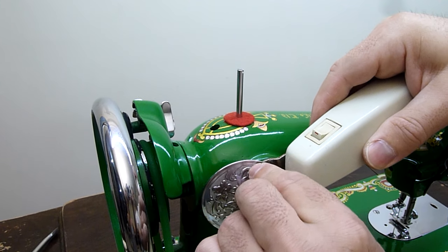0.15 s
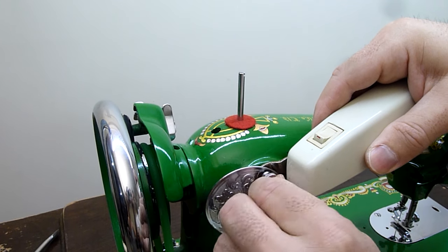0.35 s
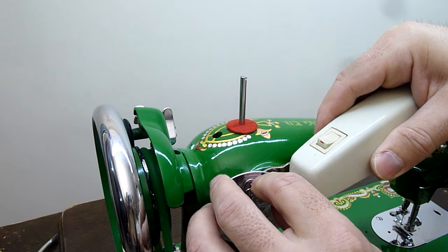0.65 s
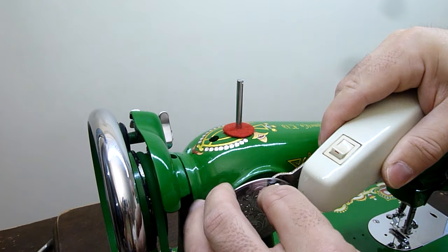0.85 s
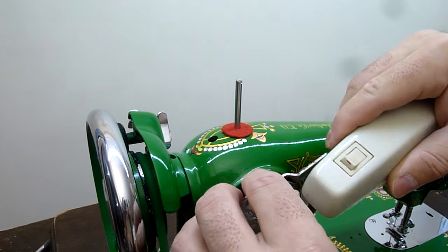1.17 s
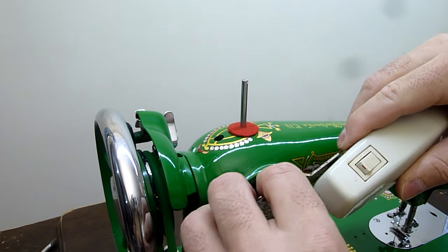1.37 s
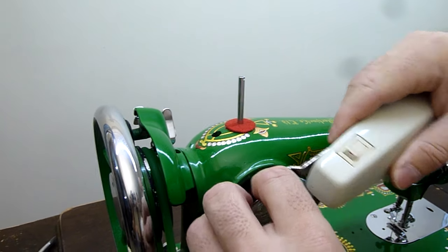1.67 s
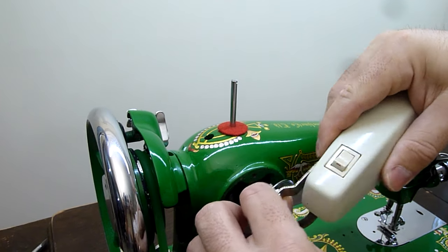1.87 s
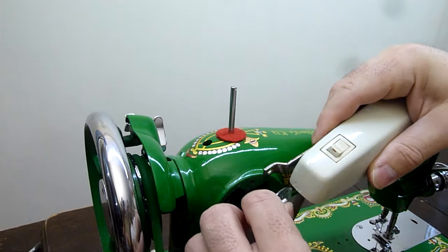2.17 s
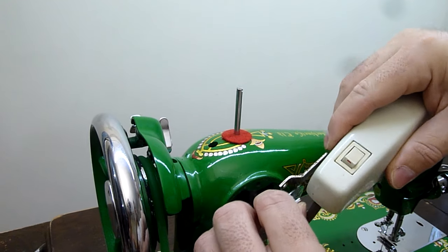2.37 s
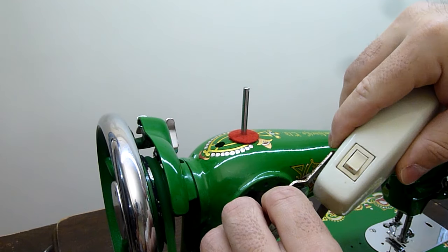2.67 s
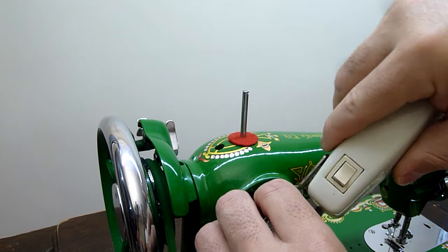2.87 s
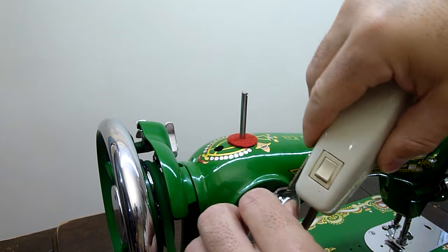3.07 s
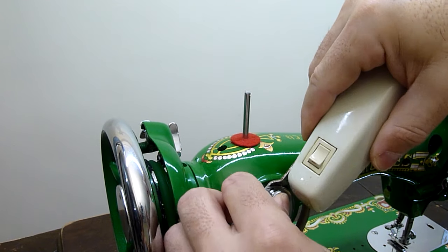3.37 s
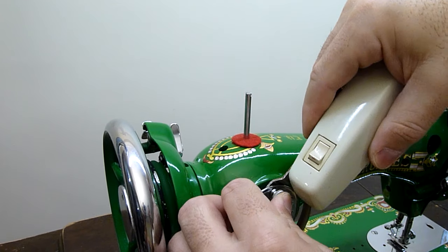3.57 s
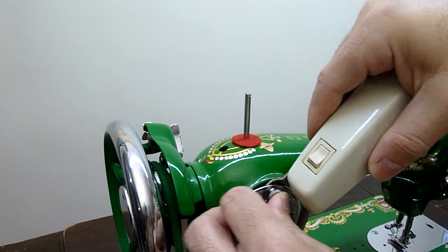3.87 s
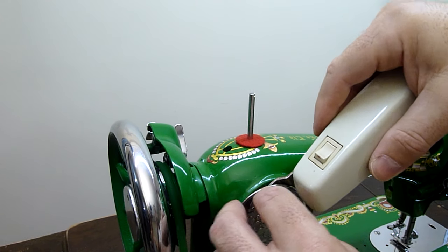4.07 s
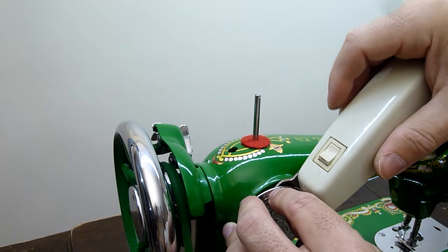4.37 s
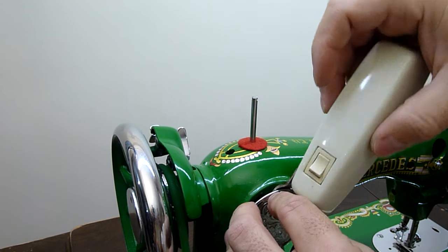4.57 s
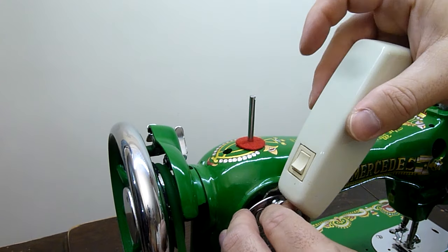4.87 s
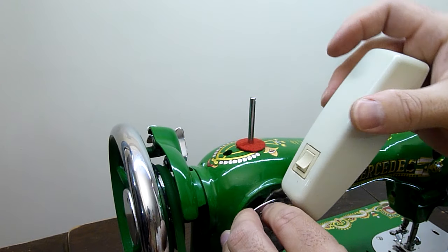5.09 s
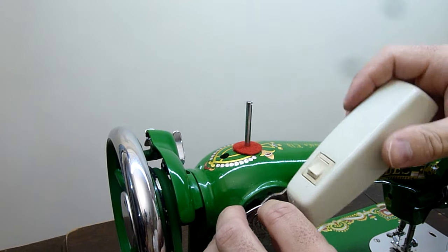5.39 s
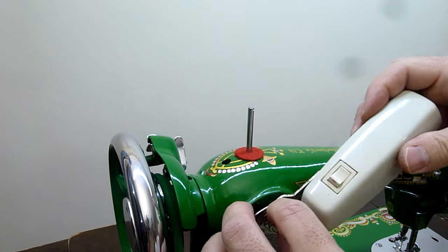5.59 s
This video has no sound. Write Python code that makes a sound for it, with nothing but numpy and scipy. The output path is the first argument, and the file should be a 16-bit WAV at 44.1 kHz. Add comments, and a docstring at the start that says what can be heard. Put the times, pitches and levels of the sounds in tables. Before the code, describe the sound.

Small metal parts clink, tap and scrape in irregular clusters against a hollow cast metal machine body, close up in a small hard room.

```python
"""Hands turn a small cover plate, lamp bracket and thumb screw on a sewing machine's hollow cast arm.
From the start, noise-burst cracks set decaying modes of arm and parts ringing, over random rubbing slips;
the touches are strongest from about 1.4 to 1.9 s. A thin wavering tone swells near 4.5 s, and a dull low
thud falls at 5.4 s. Throughout, a small hard room of feedback delays answers the close sounds, above
coloured-noise hush, steady mains sines and a low sine hum that comes and goes until about 4.5 s."""
import sys
import numpy as np
from scipy import signal
from scipy.fft import rfft, irfft, next_fast_len
from scipy.io import wavfile

SR = 44100
rng = np.random.default_rng(int(sys.argv[2]) if len(sys.argv) > 2 else 0)


def output_pcm(signal):
    """Save a mono or channel-first signal as 16-bit PCM at the path in sys.argv[1].

    Samples are clipped to [-1, 1] before scaling.
    """
    pcm = np.clip(np.atleast_2d(signal).T, -1, 1) * 32767
    wavfile.write(sys.argv[1], SR, np.round(pcm).astype(np.int16))


N = 252693


def from_db(db):
    """Decibels to gain."""
    return 10 ** (np.asarray(db) / 20)


def rms_one(x):
    """Scale to unit rms."""
    return x / np.sqrt(np.mean(x ** 2) + 1e-20)


def in_time(rows):
    """Draw each column of a table as a straight-line curve over every sample."""
    s, *columns = np.transpose(rows)
    return [np.interp(np.arange(N) / SR, s, column) for column in columns]


def at_hz(points, hz):
    """Read a table over frequency on a log axis."""
    table_hz, values = np.array(points).T
    return np.interp(np.log(hz), np.log(table_hz), values)


def band(x, low, high):
    """Gentle band-pass."""
    return signal.sosfilt(signal.butter(2, [low, high], "band", fs=SR, output="sos"), x + 1e-18)


def ring(clicks, hz, t60):
    """A two-pole resonator: a unit click starts a decaying sine of about unit height."""
    radius = from_db(-60 / (max(t60, .005) * SR))
    angle = 2 * np.pi * hz / SR
    return signal.lfilter([0, np.sin(angle)], [1, -2 * radius * np.cos(angle), radius ** 2], clicks + 1e-18)


def drift(rate):
    """Random wander: straight lines between normal draws, rate draws per second."""
    knots = rng.standard_normal(int(N / SR * rate) + 2)
    return np.interp(np.arange(N) / SR * rate, np.arange(len(knots)), knots)


def grit(per_s, spread_db):
    """Random tiny slips of uneven size and either sign; rms 1."""
    sizes = from_db(spread_db * np.minimum(rng.exponential(1, N), 5)) * rng.choice([-1, 1], N)
    return rms_one(sizes * (rng.random(N) < per_s / SR))


def coloured(white, spectrum, likeness=None):
    """Weight noise in half-octave bands, neighbours on unrelated draws; likeness makes it stereo; rms 1."""
    out = 0
    edges = 23 * 2 ** np.arange(0, 9.6, .5)
    for k, (low, high) in enumerate(zip(edges, edges[1:])):
        hz = np.sqrt(low * high)
        x = band(white[k % 2], low, high)
        if likeness:
            alike = np.clip(at_hz(likeness, hz), -1, 1)
            x = np.sqrt(1 + alike) * x[0] + np.sqrt(1 - alike) * x[1] * [[1], [-1]]
        out = out + from_db(at_hz(spectrum, hz)) * x
    return rms_one(out)


# touches of the hands, before band weighting: [t/s, parts level/dB, arm level/dB, treble level/dB,
#   favoured arm f/Hz, favoured part f/Hz, base crack t60/s,
#   fall around arm pitch/dB per octave, fall around part pitch/dB per octave, parts' ring level/dB]
TOUCHES = [(0.0185, -24.5, -34, -47, 564, 2940, 0.013, 14, 10, -10),
           (0.0339, -15, -25.5, -34, 564, 5700, 0.036, 2.5, 10.5, -0.5),
           (0.1746, -31, -52, -60, 560, 3030, 0.029, 8.0, 11, -7),
           (0.193, -45, -43.5, -54, 552, 5870, 0.03, 8.0, 5, -8),
           (0.2693, -19.5, -44, -31, 1460, 5300, 0.052, 8.0, 8.5, 4.5),
           (0.2831, -26, -38, -43, 590, 5320, 0.036, 14, 1, -12),
           (0.3075, -12.5, -24, -20.5, 510, 5700, 0.022, 3, 3, -0.5),
           (0.4314, -30.5, -61, -37, 600, 5800, 0.04, 10, 7.0, -4),
           (0.4414, -33, -29.5, -26.5, 690, 5910, 0.028, 13, -2.5, -1.0),
           (0.46, -24, -31.5, -36, 1100, 6060, 0.028, -3.5, 1, 2.5),
           (0.4953, -56, -37, -58, 1360, 5960, 0.072, 7, 7.0, -4),
           (0.607, -28, -37, -52, 1400, 2930, 0.031, 3, 0, -2),
           (0.6154, -26.5, -41, -37, 546, 7200, 0.035, 13, 7.0, -6),
           (0.7163, -22.5, -29, -37.5, 633, 3060, 0.028, 3.5, 4, -1.0),
           (0.7352, -29.5, -39.5, -42, 1180, 4780, 0.031, 1, 3, -1.5),
           (0.7613, -38, -47, -57, 653, 4700, 0.027, 8.0, 7.0, -1.0),
           (0.7761, -31.5, -27.5, -48, 610, 4600, 0.013, 13, -2, 1.5),
           (0.814, -37, -42, -46, 596, 2530, 0.046, 7, 5, -6),
           (0.83, -18.5, -50, -31, 530, 3800, 0.017, 8.0, 2, -5.5),
           (0.848, -34, -34, -54, 590, 3540, 0.013, 8.0, 9, -5),
           (0.8839, -31.5, -32, -51, 548, 4670, 0.016, 4.5, -2, -1.0),
           (0.9643, -26, -43, -43, 585, 3480, 0.028, -4, 4.5, 3.5),
           (1.051, -22, -45, -35.5, 1270, 3830, 0.03, 1, 10.5, 6.5),
           (1.1002, -27, -49, -32, 1226, 3100, 0.02, 3, -9.5, -5),
           (1.4258, -11.5, -20.5, -30, 596, 4690, 0.028, 12.5, -2.5, 0),
           (1.5653, -15, -28, -25, 530, 6910, 0.063, 3.5, 1.5, 4),
           (1.5725, -11.5, -50, -22, 536, 4580, 0.071, 5, 9.5, -4.5),
           (1.6532, -15, -19.5, -30, 605, 4460, 0.051, 10.5, -1.5, 4),
           (1.6825, -21, -33, -40, 606, 3080, 0.05, 7, 4, 2),
           (1.735, -17, -29, -31, 605, 6800, 0.059, 5.5, 13, 1),
           (1.7516, -12.5, -30, -25, 592, 2340, 0.06, 13, 2, 1),
           (1.7798, -22.5, -24, -32, 670, 2250, 0.053, 7.5, -1, 1),
           (1.7945, -9.5, -34.5, -14, 505, 5500, 0.054, 11, 12, -5),
           (1.8204, -19.5, -46, -17.5, 1190, 3200, 0.014, 14, -10, 1.5),
           (1.9178, -28, -50, -31, 550, 3170, 0.013, 8.0, -9, 2.5),
           (2, -24, -43.5, -42, 587, 4530, 0.022, 1, 4.5, 5.5),
           (2.0911, -41, -40.5, -73, 1050, 3950, 0.038, 8.0, 12, -4),
           (2.367, -9, -39, -22, 631, 4620, 0.059, 5, 8.5, -1.5),
           (2.4861, -25, -38.5, -41, 632, 5900, 0.014, 5, 0.5, -2),
           (2.5087, -11, -38, -27.5, 604, 7040, 0.067, 3, 5, 2.5),
           (2.669, -29.5, -47.5, -60, 1310, 2370, 0.036, 8.0, 7.0, -1.0),
           (2.7254, -29.5, -36.5, -49, 1380, 4660, 0.015, 7, -8.5, -1.0),
           (2.7478, -19, -37.5, -33.5, 603, 4440, 0.035, 2, 5.5, 1.5),
           (2.8446, -23.5, -45.5, -41, 546, 2530, 0.027, 3, 2, 0.5),
           (3.0354, -33.5, -33.5, -64, 900, 2350, 0.02, 9, 9, -10),
           (3.1173, -24.5, -28.5, -45, 1115, 2960, 0.034, 15, 11, 1),
           (3.1413, -17.5, -39, -32.5, 607, 2860, 0.013, 11, 4.5, -1.0),
           (3.3073, -37, -42.5, -64, 570, 2640, 0.03, -6, 18, -1.0),
           (3.4094, -29.5, -40, -56, 607, 2640, 0.028, -4, 8, -1.0),
           (3.424, -27, -41.5, -56, 576, 2720, 0.027, 2, 9, 2),
           (3.502, -28, -62, -53, 684, 2660, 0.044, 8.0, 10.5, -1.0),
           (3.6307, -22.5, -36, -44, 510, 4680, 0.061, 2.5, 3, 3),
           (3.678, -43, -41, -56, 557, 4670, 0.067, 2.5, 0, 7),
           (3.81, -38, -44, -43, 540, 6900, 0.025, 19, 7.0, 2.5),
           (3.9384, -40.5, -43.5, -50, 960, 3040, 0.027, -6, 2, 2),
           (4.1909, -32, -34, -54, 544, 2350, 0.033, 8.0, 9, -17),
           (4.3981, -42, -54, -42, 1200, 3520, 0.036, 8.0, 7.0, -2),
           (4.563, -28.5, -32.5, -45, 526, 3530, 0.025, 6.5, 11, 2),
           (4.6021, -22.5, -66, -29.5, 576, 6200, 0.032, 8.0, 9, -3),
           (4.6272, -17.5, -57, -55, 598, 6000, 0.03, 12, 14, -16),
           (4.6594, -44, -41, -55, 630, 3650, 0.029, 8.0, 7.0, -1.0),
           (4.6972, -34.5, -45, -50, 546, 4580, 0.019, 8.0, -4, 5),
           (4.7206, -22.5, -38.5, -47, 1230, 3220, 0.051, 9, 25, -1.0),
           (4.7595, -19, -40, -37, 1170, 4200, 0.018, 4, 1.5, -2.5),
           (4.7788, -44, -39, -54, 1420, 5800, 0.027, 15, 5, -4),
           (4.8374, -24, -37, -52, 540, 2670, 0.048, 1.5, 8, 2),
           (4.9437, -34, -34, -46, 531, 2900, 0.038, 3, 0, 0.5),
           (5.0805, -38, -42.5, -50, 1354, 2120, 0.12, 0, 3, 8),
           (5.1027, -31.5, -39.5, -40, 620, 4460, 0.04, -2, -1.5, 2.5),
           (5.1134, -31.5, -36.5, -58, 530, 2830, 0.075, 3, 14, -1.0),
           (5.2091, -19, -47.5, -33.5, 1170, 7360, 0.067, 8.0, 10, -6),
           (5.3746, -26, -39, -42, 1130, 2880, 0.046, 10, 3, 6),
           (5.3928, -16.5, -26.5, -42, 935, 3800, 0.049, 8.5, 13, -7),
           (5.3961, -24, -29.5, -35, 874, 2840, 0.029, 1, 9, 5),
           (5.4234, -22.5, -39.5, -32, 937, 3780, 0.025, 6, 10, -1.0),
           (5.5184, -37, -36, -46, 991, 4700, 0.024, 5, -7, -6.5),
           (5.5707, -33.5, -47.5, -77, 578, 2660, 0.026, 5, 18, -1.0)]
# edges of the five touch bands, low to high: [f/Hz]
TOUCH_EDGES_HZ = [400, 750, 1700, 3700, 8000, 16500]
# how hard a touch drives each band: [level/dB]
BAND_DB = [-4.5, 5.5, -4, -3.5, 3.5]


def touch_colours():
    """Touch level per band: arm and parts tilt around their favoured pitch, the treble stands alone."""
    part_db, arm_db, treble_db, arm_hz, part_hz = np.array(TOUCHES)[:, 1:6].T
    arm_fall, part_fall = np.array(TOUCHES)[:, 7:9].T
    edges = np.array(TOUCH_EDGES_HZ)
    centre = np.sqrt(edges[1:] * edges[:-1])[:, None]
    arm = arm_db - arm_fall * abs(np.log2(centre[:2] / arm_hz))
    part = part_db - part_fall * abs(np.log2(centre[2:4] / part_hz))
    return np.vstack([arm, part, treble_db]).T + BAND_DB


RISE_S = .0016   # base build-up time of a touch
CRACK_DB = 4
TICK_DB, TICK_SHARE = -1, 0.043   # sharp head of a crack: level, share of the crack's t60
# crack length in each band: [multiple of the touch's base t60]
CRACK_LENGTH = [2.2, 1.33, 0.73, 0.65, 0.43]
# crack build-up in each band: [multiple of RISE_S]
CRACK_RISE = [0.95, 2.6, 0.39, 0.54, 0.27]
# left-right difference of a crack in each band: [level/dB]
CRACK_SIDE_DB = [-16, -17, -14.5, -5, -5.5]


def cracks():
    """A dying noise burst per touch, shaped by band; treble dies first, the top two bands spread widest."""
    t = np.arange(round(.12 * SR)) / SR
    noise = rng.standard_normal((len(TOUCHES), 2, len(t)))
    layers = np.zeros((5, 2, N + len(t)))
    for row, colour_db, burst in zip(TOUCHES, touch_colours(), noise):
        at = round(row[0] * SR)
        t60 = np.clip(row[6], .004, .3) * np.array(CRACK_LENGTH)[:, None]
        rise = np.minimum(t / (RISE_S * np.array(CRACK_RISE)[:, None]), 1)
        body = from_db(-60 * t / t60)
        tick = from_db(TICK_DB - 60 * t / (TICK_SHARE * t60))
        shape = rise * (body + tick) * from_db(CRACK_DB + colour_db[:, None])
        layers[:, :, at:at + len(t)] += shape[:, None] * burst
    out = 0
    for layer, low, high, side_db in zip(layers, TOUCH_EDGES_HZ, TOUCH_EDGES_HZ[1:], CRACK_SIDE_DB):
        filtered = band(band(layer[:, :N], low / 1.9, min(high * 1.3, 19000)), low, high)
        # noise through a narrow band loses height, so each band is evened out
        mid, side = filtered * np.sqrt(4000 / (high - low))
        out = out + mid + from_db(side_db) * side * [[1], [-1]]
    return out


def rings(modes, share_db, favoured_hz, favour, rub, rough, wander_per_s):
    """Touches strike resonant modes, most strongly near the favoured pitch; rubbing keeps them singing."""
    top_db, octaves = favour
    at = np.round((np.array(TOUCHES)[:, 0] + RISE_S) * SR).astype(int)
    chance_db = rng.normal(0, 2, (len(TOUCHES), len(modes)))
    band_levels_db = touch_colours()
    out = 0
    for k, (hz, level_db, t60) in enumerate(modes):
        # a mode is driven as hard as its band
        colour_db = band_levels_db[:, np.searchsorted(TOUCH_EDGES_HZ, hz) - 1]
        favour_db = top_db * np.exp(-(np.log2(hz / favoured_hz) / octaves) ** 2)
        clicks = rub * from_db(level_db)
        clicks[at] += from_db(colour_db + favour_db + share_db + level_db + chance_db[:, k])
        # the contact takes a few cycles to build the ring
        clicks = band(clicks, hz / 1.12, hz * 1.12)
        # each mode stands for a cluster of close ones, beating at random
        out = out + ring(clicks, hz, t60) * (1 - rough + rough * drift(wander_per_s))
    return out


# resonances of the hollow cast arm: [f/Hz, level/dB, t60/s]
ARM = [(545.8, 1, 0.098), (591.7, 5, 0.046), (628, -5.5, 0.068), (828, -25, 0.035), (832, -19, 0.14),
       (902, -15.5, 0.15), (943, -13.5, 0.12), (1190, -12.5, 0.13), (1292, -0.5, 0.034),
       (1462, -7.5, 0.063)]


def arm_ring(on_arm):
    """The hollow arm answers touches and sliding with low modes."""
    favoured_hz = np.array(TOUCHES)[:, 4]
    rub = from_db(-25.5) * on_arm * grit(600.0, spread_db=3.0)
    favour = (13.84, 0.13)   # boost in dB, width in octaves
    return rings(ARM, -4, favoured_hz, favour, rub, rough=0.53, wander_per_s=60.0)


# resonances of the cover plate: [f/Hz, level/dB, t60/s]
PLATE = [(1975, -9.5, 0.14), (2846, 3, 0.059), (3003, -1, 0.079), (3220, -49.5, 0.24), (4650, 4, 0.057),
         (5710, 3, 0.091), (6090, -47, 0.067), (6980, 0.5, 0.15), (8320, 4, 0.083), (9330, -1, 0.09),
         (10000, -9, 0.073), (11660, -12, 0.06), (12400, -1, 0.072)]
# resonances of the lamp bracket: [f/Hz, level/dB, t60/s]
BRACKET = [(1590, -30, 0.13), (2220, -22, 0.57), (2616, -10.5, 0.35), (3790, -11, 0.28), (4396, -4, 0.045),
           (6230, -10.5, 0.21), (7560, -30, 0.067), (7440, -10, 0.08), (9900, -6.5, 0.19),
           (11200, -13, 0.17)]
# resonances of the thumb screw: [f/Hz, level/dB, t60/s]
SCREW = [(2420, -10, 0.1), (3150, 1, 0.035), (3510, -8.5, 0.082), (4600, -7, 0.11), (5180, -0.5, 0.083),
         (6400, -19, 0.066), (7130, -17, 0.058), (8900, -0.5, 0.07), (14100, -8, .07), (13300, -13, .07),
         (14250, -19, .07)]
# freedom to ring as the fingers shift their grip: [t/s, plate level/dB, bracket level/dB, screw level/dB]
GRIP = [(0, -10.5, -35, -29), (.45, -11.5, -21, -13.5), (1.0, -23, -26, -11), (1.43, -13.5, -11.5, -7.5),
        (1.65, -17, -17, -10.5), (1.82, -16.5, -14, -11), (2.37, -33, -10, -15), (2.75, -19, -15, -13),
        (3.14, -18.5, -9.5, -10), (3.63, -23, -12, -12), (4.6, -27, -17, -13), (5.1, -24, -10, -9),
        (5.21, -33, 3.5, -28), (5.35, -23, -25, -12), (5.7, -20, -24, -25)]


def part_rings(between):
    """Plate, bracket and screw ring from touches and shared slips, as freely as the grip allows."""
    slips = grit(400.0, spread_db=3.0) * between
    s, part_hz, ring_db = np.array(TOUCHES)[:, [0, 5, 9]].T
    grip_s, *grip_db = np.transpose(GRIP)
    plate_db, bracket_db, screw_db = [np.interp(s, grip_s, db) + ring_db for db in grip_db]
    favour = (10.26, 0.058)   # boost in dB, width in octaves
    plate = rings(PLATE, plate_db, part_hz, favour, from_db(-51.5) * slips, rough=0.78, wander_per_s=130.0)
    bracket = rings(BRACKET, bracket_db, part_hz, favour, from_db(-59) * slips, rough=0.93, wander_per_s=300.0)
    screw = rings(SCREW, screw_db, part_hz, favour, from_db(-41) * slips, rough=1.0, wander_per_s=570.0)
    return plate + bracket + screw


# rubbing strength: [t/s, on-arm level/dB, between-parts level/dB]
RUB = [(0.0, -47.5, -52), (0.22, -49, -52), (0.89, -53.5, -54), (1.07, -54, -58), (1.24, -86, -55),
       (1.48, -43.5, -56), (1.6, -48, -45), (1.66, -41.5, -38), (1.83, -47.5, -34), (2.06, -57, -44.5),
       (2.17, -62.5, -55), (2.41, -55.5, -52), (2.54, -50, -50), (2.68, -57.5, -51.5), (2.97, -48.5, -53),
       (3.59, -57, -54.5), (3.89, -55, -54), (4.24, -78, -54.5), (4.48, -54, -53.5), (4.72, -55, -48.5),
       (5.12, -61.5, -50.5), (5.41, -52.5, -50.5), (5.57, -44.5, -50), (5.73, -65, -57.5)]


def rubbing():
    """Gain curves of the friction on the arm and between the parts."""
    return from_db(in_time(RUB))


# colour of the parts' scrape: [f/Hz, relative level/dB per Hz]
RUB_COLOUR = [(880, -46), (1500, -2), (3090, -7), (4120, -4), (6060, -6.5), (14600, -22), (16000, -20)]


def scrape(between):
    """Dense random slips between the parts, coloured by band."""
    slips = [grit(2500.0, spread_db=-4.0), grit(2500.0, spread_db=-0.5)]
    return from_db(-5.5) * between * coloured(slips, RUB_COLOUR)


def skin(on_arm):
    """Skin sliding on paint: band-passed random slips."""
    return from_db(-7.5) * on_arm * rms_one(band(grit(1500.0, spread_db=3.5), 190, 1340))


# centre of the squeak's wavering pitch and level: [t/s, f/Hz, level/dB]
SQUEAK = [(4.44, 2970, -71), (4.49, 3200, -58), (4.53, 3450, -53), (4.59, 3570, -57), (4.62, 3440, -75)]


def squeak():
    """A thin stick-slip sine as two parts slide: it rises, then dips, with jittery pitch and level."""
    hz, level_db = in_time(SQUEAK)   # the faint end values hold before and after
    jitter = 1 + 0.045 * drift(370.0) + 0.02 * drift(60.0)
    phase = 2 * np.pi * np.cumsum(hz * jitter) / SR
    return from_db(level_db + 6 * drift(120.0)) * np.sin(phase)


PUSH_DB, PUSH_HZ = -45.5, 324   # level against the parts, low-pass corner


def pushes():
    """Every touch pushes the air a little: a low-passed click."""
    clicks = np.zeros(N)
    s, db = np.array(TOUCHES)[:, :2].T
    clicks[np.round(s * SR).astype(int)] = from_db(db + PUSH_DB) * SR / PUSH_HZ
    return signal.sosfilt(signal.butter(2, PUSH_HZ, fs=SR, output="sos"), clicks + 1e-18)


THUD_S, THUD_DB, THUD_HZ, THUD_T60_S = 5.40, -60, 128, 0.53   # THUD_DB: click level before filtering


def thud():
    """One dull low ring as the lamp settles."""
    click = np.zeros(N)
    click[round(THUD_S * SR)] = from_db(THUD_DB)
    return ring(band(click, THUD_HZ / 2, THUD_HZ * 2), THUD_HZ, THUD_T60_S)


# decay of the small hard room: [f/Hz, t60/s]
ROOM_T60 = [(300, 0.24), (2000, 0.42), (6000, 0.59), (14600, 0.41)]


def room(x):
    """Ten feedback delays a side; bass dies fastest and the range near 6 kHz lingers."""
    size = next_fast_len(N + SR)   # padding for the tail
    hz = np.maximum(np.arange(size // 2 + 1) * SR / size, 1)
    t60 = np.maximum(at_hz(ROOM_T60, hz), .05)
    out = np.zeros((2, size // 2 + 1), complex)
    for k, lag in enumerate(rng.uniform(0.0052, .031, size=20)):
        loop = from_db(-60 * lag / t60) * np.exp(-2j * np.pi * hz * lag)
        out[k % 2] += loop / (1 - loop) * (-1) ** (k // 2)
    return irfft(out * rfft(x, size), size)[:, :N]


# passages of hum: [start t/s, end t/s, centre level/dB]
HUM = [(0.028, 0.087, -63.5), (0.193, 0.36, -59.5), (0.488, 0.694, -61), (0.98, 1.135, -64.5),
       (2.01, 2.152, -58), (2.277, 2.466, -64), (2.52, 2.68, -60), (2.878, 2.97, -72), (3.463, 3.74, -65.5),
       (4.267, 4.452, -63.5)]
HUM_HZ = 213


def hum():
    """A low sine that switches on and off with 11 ms ramps, its level wandering."""
    t = np.arange(N) / SR
    on = sum(from_db(db) * np.clip(np.minimum(t - start, end - t) / 0.011, 0, 1) for start, end, db in HUM)
    return np.sqrt(2) * on * from_db(2 * drift(25.0)) * np.sin(2 * np.pi * HUM_HZ * t)


# steady mains lines: [f/Hz, rms level/dB before the microphones]
MAINS = [(100, -80.5), (400, -79.5), (500, -68.5)]


def mains():
    """Steady sines of the mains."""
    t = np.arange(N) / SR
    return np.sqrt(2) * sum(from_db(db) * np.sin(2 * np.pi * hz * t) for hz, db in MAINS)


# colour of the room's hush: [f/Hz, relative level/dB per Hz]
HUSH = [(15, -68), (25, -2), (103, -28), (128, -29), (208, -11), (445, -6.5), (496, -7), (600, -8),
        (902, -9.5), (1030, -3), (1510, -18), (1880, -12.5), (15200, -30.5), (16500, -41)]
# left-right correlation of the hush, clipped to -1..1: [f/Hz, likeness]
LIKENESS = [(60, -0.82), (180, 0.98), (550, 0.0043), (1650, -0.59), (4970, -1.44), (15000, 0.095)]


def hush():
    """Steady stereo noise, coloured and correlated band by band."""
    return from_db(-52) * coloured(rng.standard_normal((2, 2, N)), HUSH, LIKENESS)


def scene():
    """Close touches and friction, the room's answer, bass pulses and the background."""
    on_arm, between = rubbing()
    near = cracks() + arm_ring(on_arm) + part_rings(between) + scrape(between) + squeak()
    # being small, the parts radiate no bass
    near = signal.sosfilt(signal.butter(6, 480, "high", fs=SR, output="sos"), near)
    near = near + skin(on_arm)
    echoes = from_db(-19.5) * room(near.mean(axis=0))
    return near + echoes + pushes() + thud() + hum() + mains() + hush()


MIC_LOW_HZ, CUTOFF_HZ = 137, 16900   # bass corner, treble stop-band edge


def record(dry):
    """The microphones lose the bass; the top is cut."""
    thin = signal.sosfilt(signal.butter(1, MIC_LOW_HZ, "high", fs=SR, output="sos"), dry)
    return signal.sosfilt(signal.cheby2(12, 60, CUTOFF_HZ, fs=SR, output="sos"), thin)


dry = scene()
out = record(dry)
output_pcm(out)
```